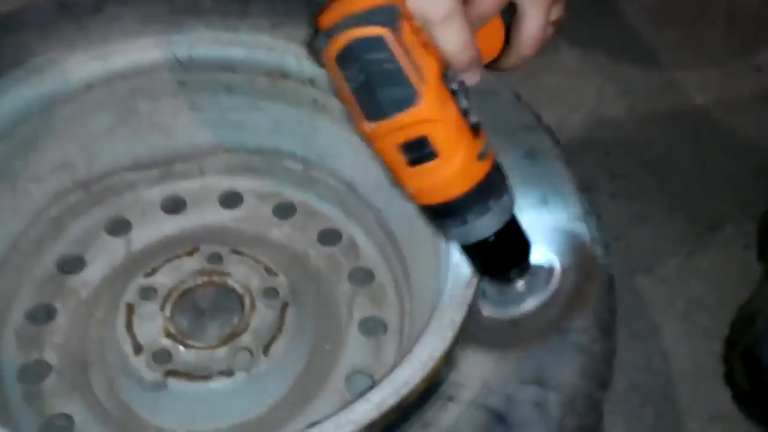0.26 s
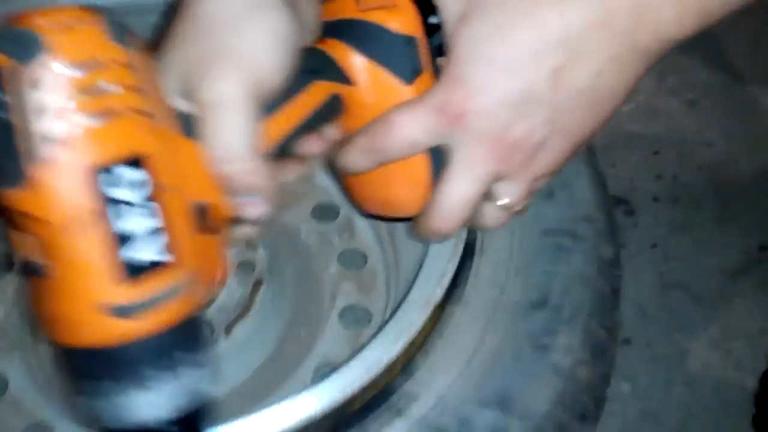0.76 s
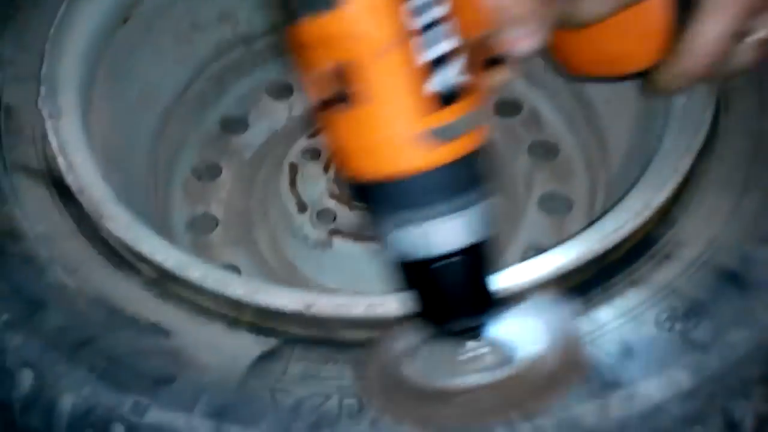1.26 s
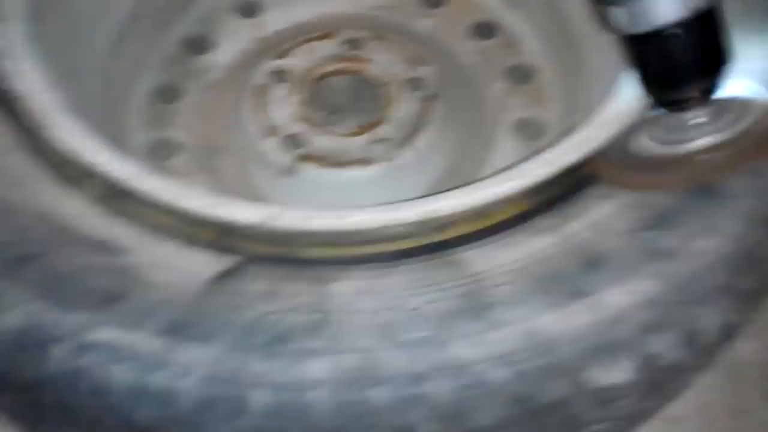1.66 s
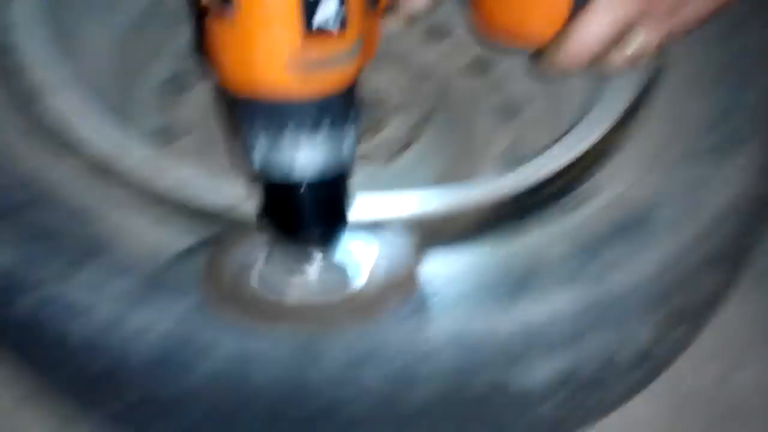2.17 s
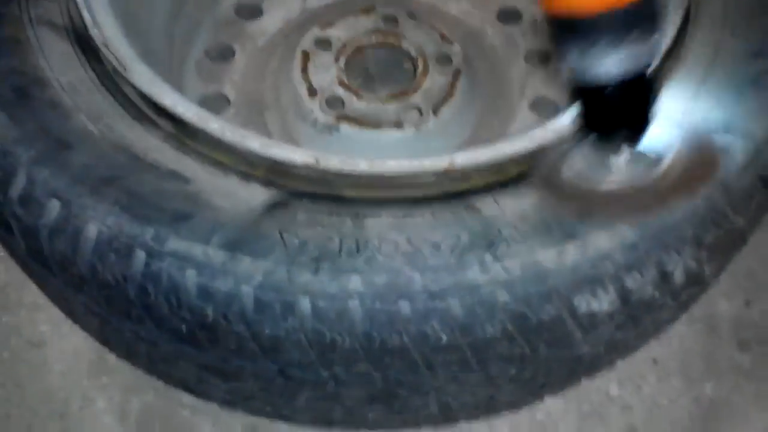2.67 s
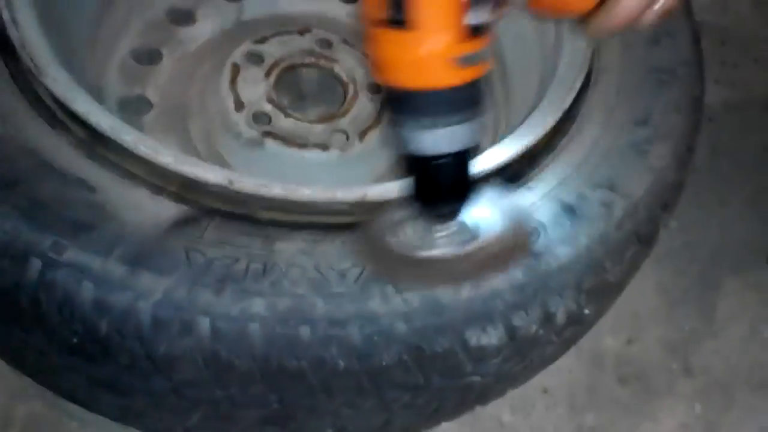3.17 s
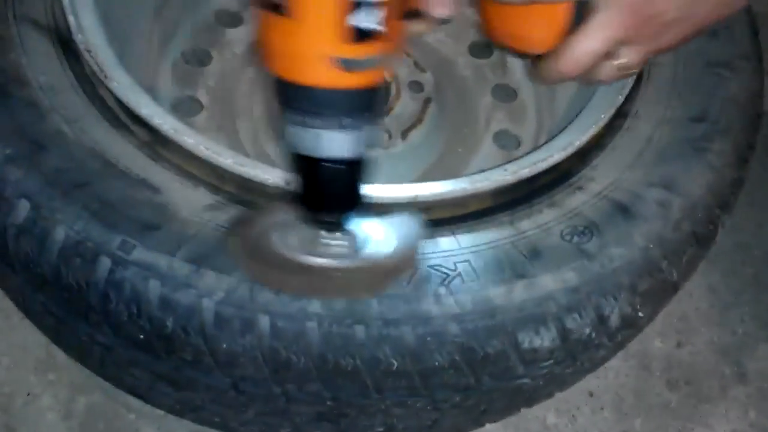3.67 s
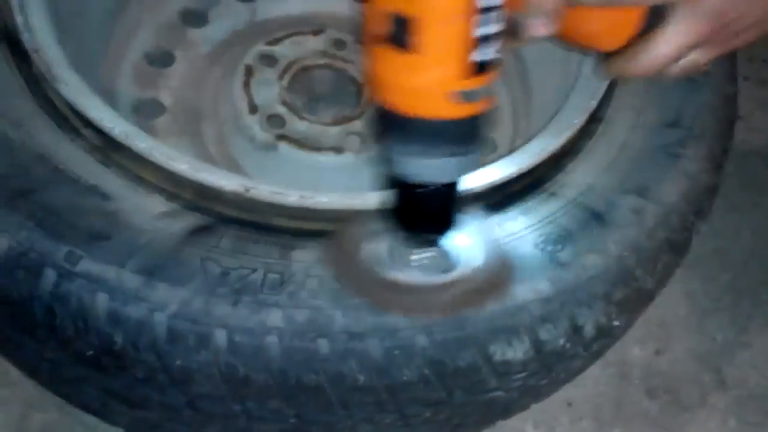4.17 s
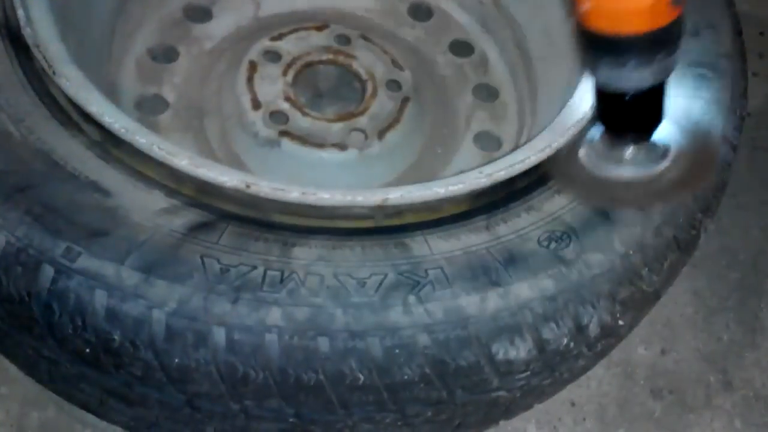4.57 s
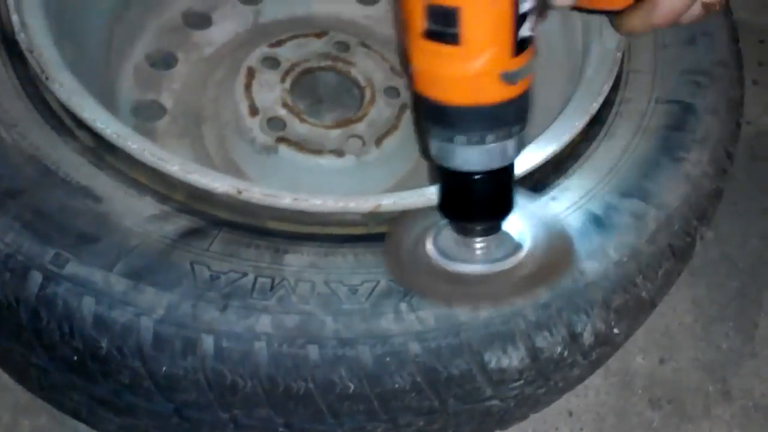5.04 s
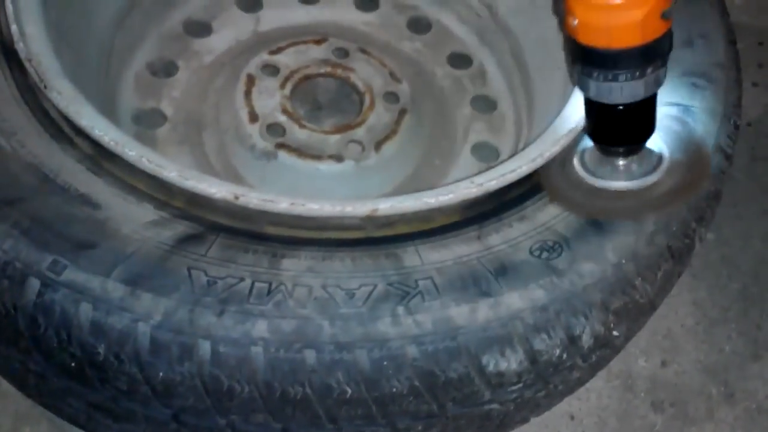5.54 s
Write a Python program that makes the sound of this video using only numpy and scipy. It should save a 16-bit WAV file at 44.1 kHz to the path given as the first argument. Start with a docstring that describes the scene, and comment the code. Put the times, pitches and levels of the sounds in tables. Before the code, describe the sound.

A drill-driven wire brush scours a steel wheel rim with a bright, pulsing rasp and a wavering gear whine.

```python
"""A wire wheel brush on a cordless drill scours the lip of a steel car rim, close by, in a garage.
Thousands of wire tips strike the lip each second: a bright rasp that pulses once a turn because the
brush runs out of true. It digs in once, and stray wires catch and snap free. The steel rings along.
Under pressure the drill slows and its gears whine near 2.7 kHz. Underneath, rim and tyre drone and
the motor hums over a faint room rumble."""
import sys
import numpy as np
from scipy import signal
from scipy.fft import rfft, irfft
from scipy.io import wavfile

SR = 44100
rng = np.random.default_rng(int(sys.argv[2]) if len(sys.argv) > 2 else 0)


def pcm_store(signal):
    """Save signal as 16-bit PCM."""
    levels = np.round(np.clip(np.atleast_2d(signal), -1, 1) * 32767)
    wavfile.write(sys.argv[1], SR, levels.astype(np.int16).T)


N = 256220
TIME = np.arange(N) / SR

# brush speed, sagging under load: t/s, speed/(turns per s)
BRUSH_SPEED = [(0, 17.7), (.2, 16.9), (.38, 18), (.56, 18.15), (.72, 17.75), (.85, 17.1), (1, 15.95),
               (1.14, 16.3), (1.3, 18), (1.43, 17.95), (1.56, 17.6), (1.66, 17.8), (1.8, 18.4), (2.5, 18.4),
               (2.7, 17.25), (2.9, 17.15), (3.12, 18.25), (3.5, 17.85), (3.9, 19.1), (4.12, 17.25),
               (4.3, 17.05), (4.39, 17.9), (4.6, 16.15), (4.73, 16.15), (4.86, 17.8), (5, 18.5),
               (5.22, 17.95), (5.38, 16.8), (5.51, 18.1), (5.64, 16.2), (5.7, 16.1), (5.81, 17.8)]
# the heavy spot meets the lip earlier or later as the drill is moved: t/s, lead/turns
HEAVY_SPOT = [(.4, .16), (.72, .32), (.99, .73), (1.15, .3), (1.38, .26), (1.56, .36), (1.84, 0.0072),
              (1.93, .36), (2.4, .35), (2.75, .3), (3.1, .21), (3.22, .41), (3.55, .54), (3.73, .24),
              (4.05, .27), (4.2, .37), (4.45, .34), (4.62, .44), (4.83, .23), (5.02, .39), (5.25, .36),
              (5.48, .21), (5.63, .37), (5.81, .26)]
# the hand leans on the drill and eases off: start t/s, hardest t/s, end t/s, boost/dB
LEANS = [(-.15, .2, 0.41, .2), (.378, .679, 0.96, 1.5), (.75, .99, 1.3, 3.5), (1.15, 1.55, 2, 1.4),
         (1.68, 1.93, 2.4, 2), (2.15, 2.44, 2.85, 2), (3.05, 3.35, 4, 1.1), (3.9, 4.15, 4.43, 2),
         (4.3, 4.628, 4.7, 2), (5.04, 5.3, 5.3, .5), (5.43, 5.66, 5.8, 1.5)]
# the brush bounces on the lip: middle t/s, length/s, extra pulse depth (relative)
BOUNCES = [(0.521, .6, 0.8), (1.0, .22, .5), (1.583, .72, 1.6), (2.79, .66, 1.2), (4.379, .3, 1.4),
           (4.78, .16, 0.8), (5.18, .2, 1.1)]
# EQ of the wires' rasp: f/Hz, level/dB
RASP_EQ = [(2300, -20.5), (2700, -7), (3100, -6.5), (3550, -3.5), (3850, -1), (4200, 0), (4700, -3),
           (5300, -6), (5900, -14.5), (6800, -45)]
# EQ of the sizzle on top of the rasp: f/Hz, level/dB
SIZZLE_EQ = [(4800, -20.5), (5500, 0.5), (5900, 4), (6500, 0.5), (7000, -1.5), (7500, -7.5), (8000, -20.5),
             (8200, -53.5)]
# fader of the sizzle: t/s, level/dB
SIZZLE_FADER = [(0, -28.5), (.33, -28), (.48, -27.5), (1.0, -25.5), (1.25, -24), (1.53, -31), (1.85, -23.5),
                (2.35, -25), (2.85, -28), (3.8, -26.5), (4.2, -25.5), (4.7, -27.5), (4.95, -25.5),
                (5.25, -27), (5.81, -28)]
# sliding wire resonances: start t/s, end t/s, first f/Hz, middle f/Hz, last f/Hz, level/dB
GLINTS = [(-.15, .36, 5560, 5550, 5500, -11), (.26, .78, 6600, 6900, 7050, -15),
          (.22, .95, 3900, 4310, 5030, -3), (.72, 1.22, 4950, 4600, 4100, -5.5),
          (1.18, 1.85, 6200, 5720, 5395, -8.5), (1.15, 1.6, 4500, 4400, 4250, -9.5),
          (1.25, 1.92, 2920, 2960, 3050, -9.5), (1.68, 2.6, 6560, 6550, 6370, -16),
          (1.8, 2.28, 4000, 4100, 4147, -6), (2.1, 3.05, 5950, 5730, 5680, -9),
          (2.28, 2.72, 4450, 4420, 4400, -8), (2.6, 3.08, 3150, 3480, 3700, -10.5),
          (2.82, 3.2, 4150, 4400, 4700, -9.5), (3.0, 3.42, 4700, 4950, 5100, -3),
          (3.25, 3.72, 4400, 4350, 4250, -10), (3.05, 3.7, 6700, 6900, 6700, -16.5),
          (3.45, 4.15, 4900, 4980, 5200, -6), (4.0, 4.42, 5270, 5400, 5510, -6),
          (4.2, 4.9, 4300, 4030, 4150, -7), (4.752, 5.3, 5030, 5060, 5106, -8.5),
          (5.45, 5.82, 4200, 4100, 4100, -6), (5.45, 6.0, 5060, 5150, 5210, -11)]
# notches that hollow the scrape: start t/s, end t/s, first f/Hz, last f/Hz, deepest level/dB
HOLLOWS = [(1.25, 1.95, 2230, 2420, -7), (2.0, 2.45, 2250, 2200, -7.5), (2.1, 2.5, 4400, 4100, -2),
           (2.35, 3.1, 2300, 2300, -5), (2.7, 3.45, 3750, 3900, -2.5), (3.05, 3.75, 3300, 3050, -5),
           (3.6, 4.1, 2800, 2750, -7.5)]
# single wires snapping free: t/s, level/dB
SNAPS = [(.884, -6.5), (.939, 3), (.969, -12), (1.039, -5), (1.154, -4), (1.177, 0), (1.192, -4.5),
         (1.202, -6), (1.21, -6), (1.232, -5), (1.251, -1), (1.595, -8), (2.928, -7), (3.368, -10.5),
         (4.184, -8), (4.427, -9), (4.542, -9)]
# modes of the steel rim: f/Hz, width/Hz, level/dB
RIM_MODES = [(513, 32, 2), (625, 79, -6), (914, 93, -4), (1124, 11, -9.5), (2100, 80, -4), (2610, 45, 1.5)]
# EQ of the lip's ring: f/Hz, level/dB
LIP_EQ = [(200, -31), (400, -20), (500, -13.5), (700, -7.5), (950, -3.5), (1330, -0.5), (1500, -2),
          (1850, -3), (2150, -2), (2450, -0.5), (3000, -15)]
# group fader of the rim's lip, dish and drone: t/s, level/dB
RIM_FADER = [(0, -34), (.35, -33), (.72, -29), (1.05, -26), (1.25, -28), (1.62, -32.5), (1.85, -28),
             (2.15, -28), (2.45, -28.5), (2.88, -35), (3.15, -30), (3.5, -30.5), (3.82, -31.5),
             (4.08, -28.5), (4.4, -32.5), (4.75, -32.5), (5.05, -29.5), (5.4, -33.5), (5.62, -31.5),
             (5.81, -34)]
# centre of the barrel's ring, moving with the place of contact: t/s, f/Hz
BARREL_CENTRE = [(.55, 1860), (.8, 1756), (1.05, 1630), (1.25, 1956), (1.9, 1720), (2.5, 1780), (3.3, 1600),
                 (4.2, 1850)]
# EQ of the barrel's ring: f/Hz, level/dB
BARREL_EQ = [(1000, -16), (1450, -2), (1900, -0.5), (2300, -4), (3200, -2.5)]
# fader of the barrel as the brush sweeps to and fro along the lip: t/s, level/dB
BARREL_FADER = [(0, -41.5), (.33, -39), (.72, -25.5), (1.2, -25), (1.55, -37), (1.88, -31), (2.45, -29.5),
                (2.62, -31), (2.9, -39), (3.15, -33.5), (3.5, -31), (3.83, -37), (4.05, -31.5), (4.4, -37),
                (5.12, -33), (5.45, -41.5), (5.63, -34), (5.81, -40.5)]
# gear whine, rising with the load: t/s, level/dB, roughness/(0-1)
WHINE_CURVES = [(0, -40, .8), (.2, -31.5, .8), (.45, -44, .8), (.76, -32, .5), (.83, -24, 0.2),
                (.92, -22.5, 0.2), (.99, -17, .3), (1.04, -20.5, .4), (1.13, -24.5, 0.8), (1.3, -26.5, .6),
                (1.37, -27.5, .5), (1.43, -25.5, .35), (1.53, -24.5, 0.4), (1.65, -21, .3),
                (1.71, -27, .45), (1.77, -24.5, .35), (1.85, -42, .8), (2.5, -36, .8), (2.63, -25.5, .6),
                (2.75, -24, .45), (2.83, -28.5, .6), (2.93, -29, .75), (3.08, -42, 0.53), (3.45, -29.5, .3),
                (3.7, -38, .5), (4.04, -45, .6), (4.1, -30, 0.5), (4.19, -25.5, .45), (4.3, -30, .6),
                (4.36, -26.5, .4), (4.5, -28, .55), (4.65, -24, .5), (4.71, -31, .7), (4.8, -28, .5),
                (4.85, -45, .7), (5.12, -40, .7), (5.18, -27, 0.3), (5.3, -27, .5), (5.41, -28, .45),
                (5.53, -30.5, .55), (5.66, -24.5, .4), (5.81, -33.5, .7)]
# EQ of the tyre's boom: f/Hz, level/dB
BOOM_EQ = [(130, -31), (170, -12.5), (197, 1.5), (215, -3), (230, -12.5), (245, -5.5), (290, -7.5),
           (340, -19.5), (450, -34)]
# fader of the tyre's boom: t/s, level/dB
BOOM_FADER = [(0, -43.5), (.2, -44.5), (.35, -50.5), (.72, -49), (.92, -41.5), (1.15, -44), (1.3, -47.5),
              (2.0, -52.5), (2.3, -47), (2.9, -44.5), (3.22, -54), (3.43, -42.5), (3.78, -51),
              (4.05, -42.5), (4.45, -41), (5.0, -43), (5.23, -37.5), (5.45, -42.5), (5.72, -38)]
# EQ of the rim's drone: f/Hz, level/dB
DRONE_EQ = [(130, -18), (160, -4), (270, -4), (350, 1.5), (410, -3.5), (500, -1), (650, -3.5), (1000, -12)]
# partials of the motor's hum: multiple of the turn rate, level/dB
HUM_PARTIALS = [(9, -5.5), (18, 0)]
# fader of the hum: t/s, level/dB
HUM_FADER = [(0, -57), (.45, -52), (1, -57), (1.4, -53.5), (1.75, -56), (2.2, -51.5), (2.7, -51.5),
             (3.3, -51), (3.8, -55), (4.2, -54), (4.7, -56), (5.1, -54), (5.81, -56)]
# EQ of the garage's room tone: f/Hz, level/dB
ROOM_EQ = [(20, -10), (55, -13), (75, 0), (110, 2), (150, 0.5), (300, -7)]

DIG_START_S, DIG_END_S, DIG_RAMP_S = 1.11, 1.278, 0.042  # the brush digs into the lip once


def scrape(dig, base_db=-19, dig_db=6.5, shimmer_db=0.48):
    """Wire tips rasp on steel, louder as the brush leans or digs in, with a fine sizzle on top."""
    tips = steel_tail(strikes(per_s=12000), t60=0.12, wet=0.2)
    rasp = from_db(0.35 + shimmer_db * drift(13)) * eq(tips, RASP_EQ)
    fine_tips = steel_tail(strikes(per_s=14000), t60=0.24, wet=0.21)
    sizzle = from_db(curve(SIZZLE_FADER) - 1.27 + shimmer_db * drift(11)) * eq(fine_tips, SIZZLE_EQ)
    glint, glint_power = glints()
    body = (rasp + glint) / np.sqrt(1 + 0.62 * glint_power)  # a glint draws its energy from the rasp
    return from_db(base_db + lean_db() + dig_db * dig) * body + sizzle


def lean_db():
    """Each lean of the hand swells the scrape and eases off."""
    return sum(db * np.sin(np.pi / 2 * np.interp(TIME, [start, hardest, end], [0, 1, 0])) ** 2
               for start, hardest, end, db in LEANS)


def bouncing(base=0.97):
    """Relative depth of the once-a-turn pulse: each spell of bouncing builds and dies away."""
    return base + sum(extra * np.sin(np.pi * ramp(middle - length / 2, length))
                      for middle, length, extra in BOUNCES)


def pressure(angle, bounce, chatter_db=0.43):
    """Tremolo: the brush presses hardest once a turn, and its uneven tufts chatter on top."""
    pulse_db = 0.88 * bounce * (np.cos(angle) + 0.2 * np.cos(2 * angle))
    return from_db(pulse_db + chatter_db * drift(83) + 0.43)


def glints(width_hz=310, wobble=0.01, fade_s=0.18):
    """Wire resonances fade in, slide as the brush tilts and fade out; returns sound and power."""
    sound = power = 0
    blows = strikes(per_s=8300, spread_db=3)
    waver = 1 + wobble * drift(34)
    for start, end, first_hz, middle_hz, last_hz, db in GLINTS:
        hz = waver * np.interp(TIME, [start, (start + end) / 2, end], [first_hz, middle_hz, last_hz])
        gain = from_db(db) * ramp(start, fade_s) * (1 - ramp(end - fade_s, fade_s))
        sound += gain * rms_one(resonance(resonance(blows, hz, width_hz), hz, 2 * width_hz))
        power += gain ** 2
    return from_db(0.8 * drift(10)) * sound, power


def hollowed(x, width_hz=400):
    """Swept notches: a band of the scrape thins out for a while and fills again."""
    for start, end, first_hz, last_hz, db in HOLLOWS:
        depth = 1 - from_db(db * np.sin(np.pi * ramp(start, end - start)))
        x = x - depth * resonance(x, np.interp(TIME, [start, end], [first_hz, last_hz]), width_hz)
    return x


def bite(dig, level_db=-15.5, fade_db_per_s=40):
    """The tips jam against the lip and chatter: hard, separate hits, strongest as they first catch."""
    hits = steel_tail(strikes(per_s=900), t60=0.06, wet=0.3)
    ringing = eq(resonance(hits, hz=4150, width_hz=1000), RASP_EQ)
    return dig * from_db(level_db - fade_db_per_s * np.clip(TIME - DIG_START_S, 0, 1)) * ringing


def snaps():
    """Caught wires spring free, each with a short sharp tick."""
    clicks = np.zeros(N)
    for t, db in SNAPS:
        clicks[round(t * SR)] = from_db(db)
    ticks = eq(clicks, RASP_EQ)
    return ticks * clicks.max() / np.abs(ticks).max()


def rim_lip(rim_db):
    """The wires' blows ring the steel lip at the rim's modes."""
    blows = steel_tail(strikes(per_s=5500), t60=0.16, wet=0.3)
    modes = sum(from_db(db - 0.5) * resonance(blows, hz, width) for hz, width, db in RIM_MODES)
    return from_db(rim_db + 1.5) * eq(blows + modes, LIP_EQ)


def rim_dish(rim_db, trim_db=-9.5, rise_db=5):
    """The dish rings in a close pair of modes and comes forward about halfway through."""
    taps = resonance(strikes(per_s=6000), hz=1283, width_hz=410)
    pair = resonance(taps, hz=1230, width_hz=120) - resonance(taps, hz=1386, width_hz=89)
    return from_db(rim_db + trim_db + rise_db * ramp(start_s=2.3, length_s=0.38)) * rms_one(pair)


def rim_barrel():
    """The barrel rings in a broad midrange band that moves with the place of contact."""
    blows = steel_tail(strikes(per_s=6000, spread_db=3.5), t60=0.091, wet=0.34)
    ringing = resonance(blows, curve(BARREL_CENTRE), width_hz=420)
    return from_db(curve(BARREL_FADER) - 0.5) * eq(ringing, BARREL_EQ)


def wheel_reflection(x, delay_s=0.0028, sway=0.061, wet=0.15):
    """A light flange: the path of the reflection off the wheel changes as the drill moves."""
    late = np.interp(TIME - delay_s * (1 + sway * drift(0.87)), TIME, x, left=0)
    return (x + wet * late) / np.sqrt(1 + wet ** 2)


def gear_whine(speed, angle, bounce, teeth_per_turn=160, bend=0.009, waver=0.003):
    """The loaded gears whine; each pass of the heavy spot brakes them into a falling chirp."""
    hz = teeth_per_turn * speed * (1 - bend * bounce * np.sin(angle) + waver * drift(50))
    tone = np.sqrt(2) * np.sin(2 * np.pi * np.cumsum(hz) / SR)
    # the chatter of the wires shakes the mesh and roughens the tone
    chatter = strikes(per_s=6000, spread_db=1)
    grit = rms_one(resonance(resonance(chatter, hz, width_hz=260), hz, width_hz=500))
    roughness = curve(WHINE_CURVES, column=2)
    whine = np.sqrt(1 - roughness ** 2) * tone + roughness * grit
    # opposite the heavy spot the load is off and the whine ducks, deeper with hard bouncing
    duck_db = 3.5 * bounce * ((1 - np.cos(angle)) / 2) ** 1.5
    return from_db(curve(WHINE_CURVES) + 1.2 + drift(26) - duck_db) * whine


def wheel_drone(rim_db, turns):
    """The tufts shake the wheel much alike on every turn: tyre and rim drone in a comb of low lines."""
    boom = from_db(curve(BOOM_FADER) - 2) * eq(tufts(turns, alike=0.42), BOOM_EQ)
    drone = from_db(rim_db - 16.5) * eq(tufts(turns, alike=0.68), DRONE_EQ)
    return boom + drone


def tufts(turns, alike, points_per_turn=256):
    """The uneven pull of the tufts round the brush: each turn carries over part of its neighbour."""
    pulls = rng.standard_normal((int(turns[-1]) + 30, points_per_turn))
    pattern = signal.lfilter([1], [1, -alike], pulls, axis=0)[::-1].ravel()
    return np.interp(turns * points_per_turn, np.arange(len(pattern)), pattern)


def motor_hum(turns, flutter_db=1.6):
    """The drive hums in low partials locked to the brush."""
    hum_db = curve(HUM_FADER)
    return sum(from_db(hum_db + db + flutter_db * drift(5.1)) * np.sqrt(2) * np.sin(2 * np.pi * k * turns)
               for k, db in HUM_PARTIALS)


def room_tone(level_db=-64.5):
    """A faint bed of low rumble in the garage."""
    return from_db(level_db) * eq(rng.standard_normal(N), ROOM_EQ)


def strikes(per_s, spread_db=2.5):
    """Wire tips hit the steel at random, a few much harder than the rest."""
    sizes = from_db(spread_db * np.minimum(rng.exponential(1, N), 5)) * rng.choice([-1, 1], N)
    return rms_one(sizes * (rng.random(N) < per_s / SR))


def steel_tail(x, t60, wet):
    """The rim's countless high modes ring on after every blow, dying by 60 dB in t60 seconds."""
    tail = rng.standard_normal(SR // 4) * from_db(-60 * TIME[:SR // 4] / t60)
    return rms_one(rms_one(x) + wet * rms_one(signal.fftconvolve(x, tail)[:N]))


def resonance(x, hz, width_hz):
    """A sweepable band-pass with unity gain at its centre."""
    spin = np.exp(2j * np.pi * np.cumsum(hz + np.zeros(N)) / SR)
    pole = np.exp(-np.pi * width_hz / SR)
    return 2 * np.real(spin * signal.lfilter([1 - pole], [1, -pole], x / spin))


def eq(x, points):
    """Shape x with an EQ curve that rolls off 20 dB an octave past its ends; rms 1."""
    hz, db = np.transpose(points)
    octave, nodes = np.log2(np.arange(N // 2 + 1) * SR / N + 1), np.log2(hz)
    outside = np.abs(octave - np.clip(octave, nodes[0], nodes[-1]))
    return rms_one(irfft(rfft(x) * from_db(np.interp(octave, nodes, db) - 20 * outside), N))


def drift(rate_hz, size=8192):
    """A smooth random LFO with rms 1, rolling off above rate_hz."""
    hz = np.arange(size // 2 + 1) * SR / N
    slow = irfft(rfft(rng.standard_normal(size)) / (1 + (hz / rate_hz) ** 2), size)
    return np.interp(TIME, np.linspace(0, N / SR, size), rms_one(slow))


def curve(rows, column=1):
    """One column of an automation table, at every sample."""
    columns = np.transpose(rows)
    return np.interp(TIME, columns[0], columns[column])


def ramp(start_s, length_s):
    """Linear fade from 0 to 1."""
    return np.clip((TIME - start_s) / length_s, 0, 1)


def from_db(db):
    """Decibels to gain."""
    return 10 ** (np.asarray(db) / 20)


def rms_one(x):
    """Scale to rms 1."""
    return x / np.sqrt(np.mean(x ** 2) + 1e-20)


def scene():
    """Brush, wheel, drill and room, mixed in mono on both channels."""
    speed = curve(BRUSH_SPEED)
    turns = np.cumsum(speed) / SR
    angle = 2 * np.pi * (turns + curve(HEAVY_SPOT))  # a whole turn each time the heavy spot lands
    bounce = bouncing()
    dig = ramp(DIG_START_S, DIG_RAMP_S) * (1 - ramp(DIG_END_S - DIG_RAMP_S, DIG_RAMP_S))
    rim_db = curve(RIM_FADER)
    tremolo = pressure(angle, bounce)
    scouring = wheel_reflection(scrape(dig) + rim_lip(rim_db) + rim_dish(rim_db) + rim_barrel())
    brush = tremolo * (hollowed(scouring) + gear_whine(speed, angle, bounce))
    room = room_tone()
    mono = brush + bite(dig) + snaps() + wheel_drone(rim_db, turns) + motor_hum(turns) + room
    return np.array([mono, mono])


def record(dry):
    """Master chain: hard-clip the highest peaks, roll off the deepest bass, cut the top steeply."""
    clipped = np.clip(dry, -0.92, 0.92)
    low_cut = signal.butter(1, 45, "high", fs=SR, output="sos")
    high_cut = signal.ellip(14, 0.1, 90, 8118, fs=SR, output="sos")
    return 0.99 * signal.sosfilt(high_cut, signal.sosfilt(low_cut, clipped))


dry = scene()
out = record(dry)
pcm_store(out)
```